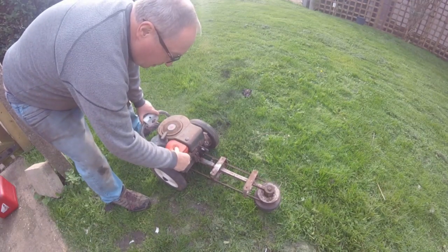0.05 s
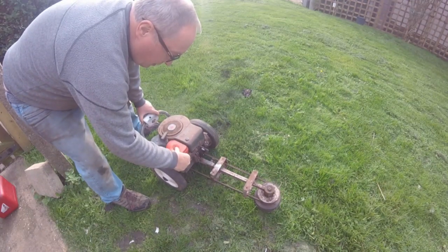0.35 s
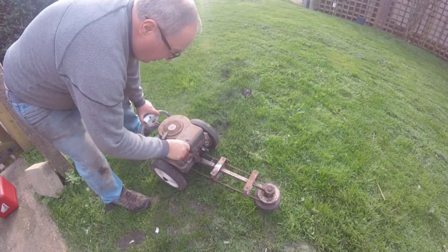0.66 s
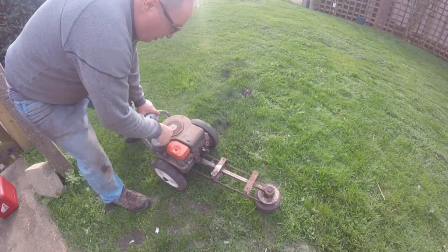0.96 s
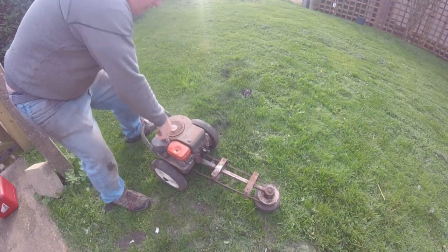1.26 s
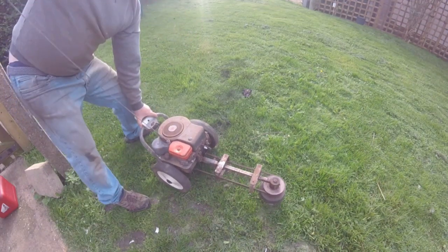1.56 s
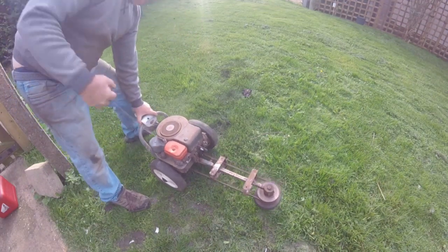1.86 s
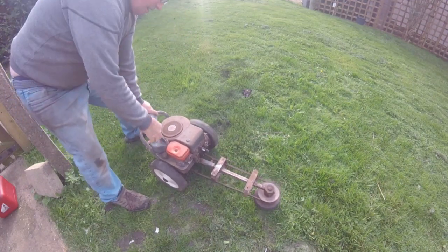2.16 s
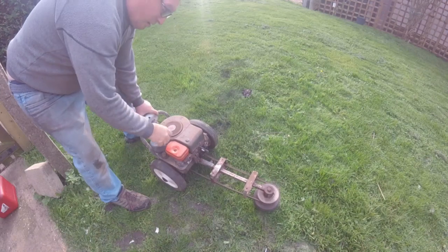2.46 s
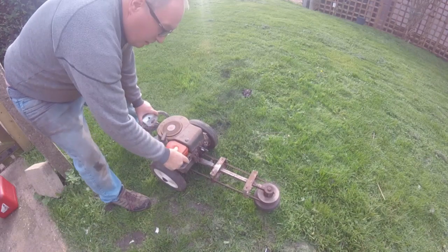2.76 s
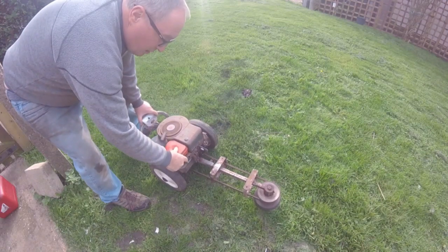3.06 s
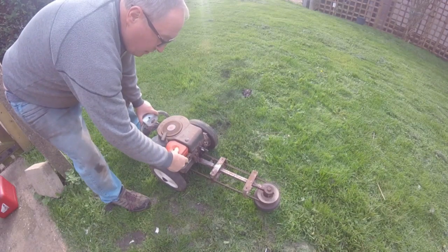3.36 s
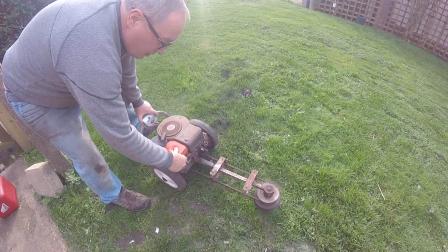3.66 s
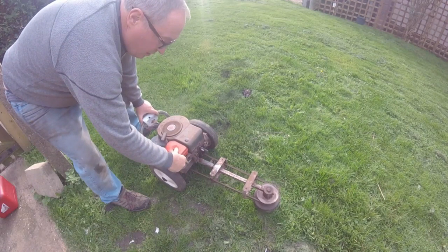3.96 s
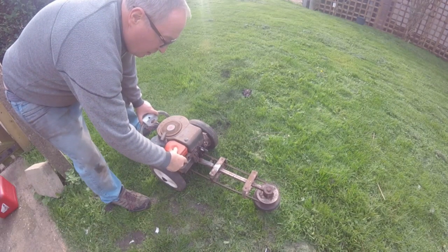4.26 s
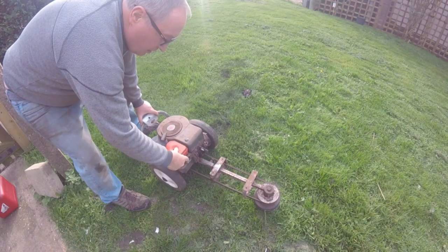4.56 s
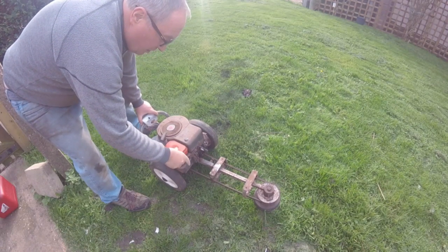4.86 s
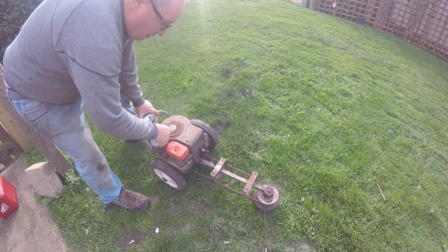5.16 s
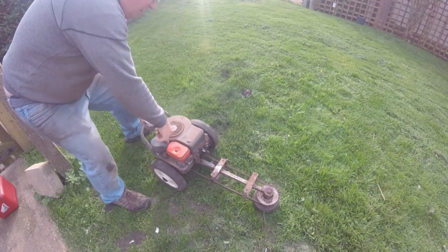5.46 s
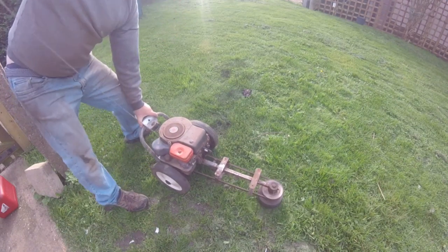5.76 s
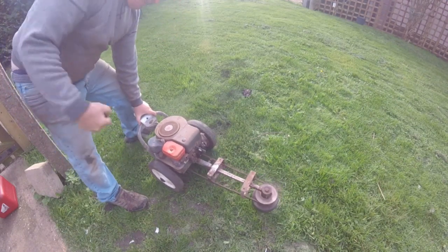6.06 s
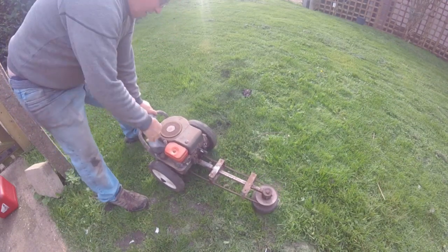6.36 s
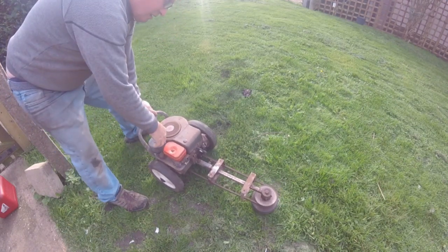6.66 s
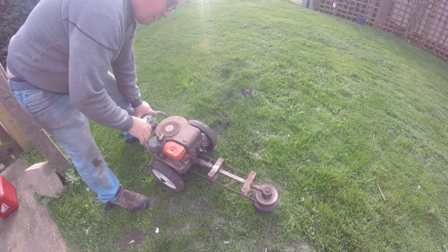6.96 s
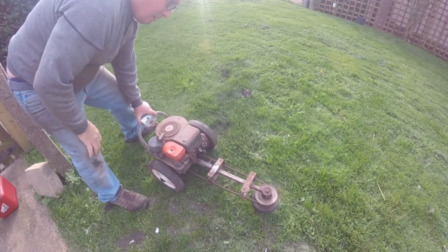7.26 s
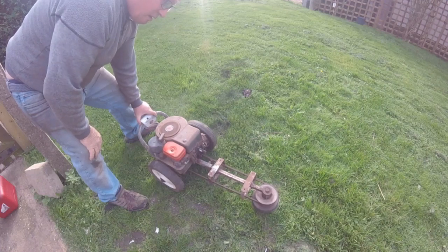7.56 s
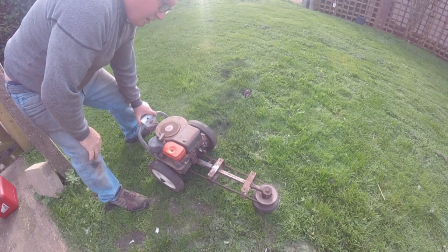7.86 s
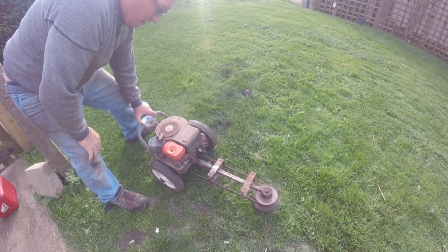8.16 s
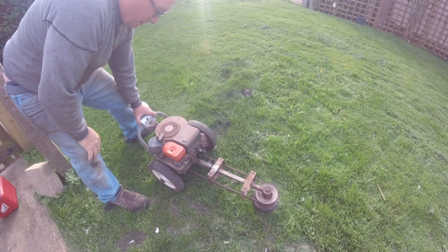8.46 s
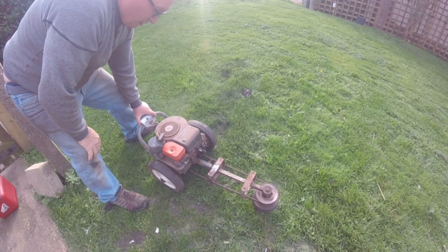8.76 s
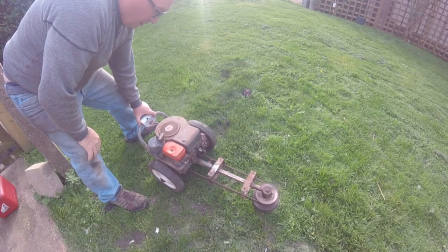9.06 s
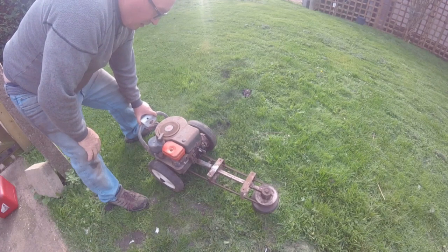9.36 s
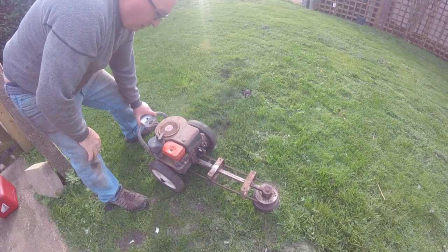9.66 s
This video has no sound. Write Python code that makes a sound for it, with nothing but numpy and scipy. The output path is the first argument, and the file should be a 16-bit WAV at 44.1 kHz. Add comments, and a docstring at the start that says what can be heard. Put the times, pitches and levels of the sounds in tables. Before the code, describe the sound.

Two rasping pulls of a starter rope fire up a garden trimmer's engine, which putters unevenly and dies both times, over light wind.

```python
"""Light wind rumbles over a lawn. At 1.4 s an old single-cylinder petrol engine is pull-started: the pawls
catch, the rope whirrs out by friction and the handle clacks on the resonant cowl. The engine chugs, each
cycle a burn, an exhaust pulse and an intake gasp, over clattering sheet metal, and a fence echoes it.
Near 4 s it stalls. A second pull at 5.6 s starts it again, until it misfires and dies just after 9 s."""
import sys
import numpy as np
from scipy import signal
from scipy.fft import rfft, irfft, next_fast_len
from scipy.io import wavfile
from scipy.ndimage import uniform_filter1d, minimum_filter1d, map_coordinates

SR = 44100
rng = np.random.default_rng(int(sys.argv[2]) if len(sys.argv) > 2 else 0)


def to_wav(sig):
    """Store sig (one row per channel, or 1-D mono) as 16-bit WAV at the path in sys.argv[1].

    Samples outside -1..1 are clipped; the rate is SR.
    """
    pcm = np.clip(np.atleast_2d(sig), -1, 1) * 32767
    pcm = np.round(pcm).astype(np.int16)
    wavfile.write(sys.argv[1], SR, pcm.T)  # frames by channels


N = 432621
TIME = np.arange(N) / SR
AGE = np.arange(-SR // 10, SR // 5) / SR  # seconds around one event

# engine speed, one curve a run: time_s, firing_rate_hz
SPEED = [
    [(1.563, 7.855), (2.141, 13.114), (2.327, 12.435), (2.505, 10.024), (2.712, 9.974), (2.718, 8.823),
     (3.008, 9.635), (3.152, 10.782), (3.26, 9.666), (3.786, 10.035), (3.874, 6.823), (4.415, 2.303)],
    [(5.723, 8.587), (5.913, 5.756), (6.166, 8.25), (6.621, 12.155), (6.798, 10.684), (7.123, 12.364),
     (7.516, 9.154), (7.54, 10.339), (7.687, 9.743), (8.041, 9.44), (8.306, 8.225), (8.439, 8.486),
     (8.903, 7.271), (9.005, 6.579), (9.465, 5.489)],
]
# relative firing strength, one curve a run; a late burn barks: time_s, thump_db, bark_db
EFFORT = [
    [(1.56, -13, -37), (1.69, -6, -25), (1.89, -3.5, -25.5), (2.2, -3, -22), (2.66, -4, -18),
     (3.18, -3.5, -16.5), (3.42, -3.4, -22.5), (3.72, -2, -16.5), (3.91, -12.5, -31), (4.09, -17.5, -48),
     (4.33, -28.5, -56)],
    [(5.72, -10.5, -39), (5.95, -16.5, -46), (6.17, -4, -15), (6.39, -3, -22.5), (6.64, -3, -22),
     (6.72, -4, -17.5), (7.1, -2.5, -21), (7.44, -3, -19), (8.28, -2, -22), (9.06, -4, -19.5),
     (9.21, -14.5, -29), (9.39, -29, -51)],
]
# charges that only half burn: time_s, loss_db
MISFIRES = [(2.46, 4), (8.16, 3), (8.64, 3), (8.9, 7.5)]
HEALTHY_THUMP_DB = -3
LIMP_BELOW_HZ, LIMP_RANGE_HZ, LIMP_SHIFT_S = 10.8, 2.5, .0035

def firings():
    """Four-stroke cycle, one firing in two turns: time_s, cycle_s, thump_db, bark_db, hiss_db, burn_db."""
    runs = []
    for speed, effort in zip(SPEED, EFFORT):
        knots_s, knots_hz = np.transpose(speed)
        t = TIME[(TIME >= knots_s[0]) & (TIME <= knots_s[-1])]
        cycles = np.cumsum(np.interp(t, knots_s, knots_hz)) / SR
        stroke = np.arange(int(cycles[-1]) + 1)
        time_s = np.interp(stroke, cycles, t)
        rate = np.interp(time_s, knots_s, knots_hz)
        # a slow engine limps: every second firing comes later and burns harder
        limp = np.where(stroke % 2, 1, -1) * np.clip((LIMP_BELOW_HZ - rate) / LIMP_RANGE_HZ, 0, 1)
        effort_s, thump_db, bark_db = np.transpose(effort)
        loss_db = sum(db * (np.abs(time_s - when) * rate < .5) for when, db in MISFIRES)
        scatter = rng.standard_normal((len(time_s), 3)).T
        thump_db = np.interp(time_s, effort_s, thump_db) - loss_db + .5 * scatter[0]
        bark_db = np.interp(time_s, effort_s, bark_db) - loss_db + 1.5 * scatter[1]
        vigour_db = thump_db - HEALTHY_THUMP_DB
        hiss_db = -26.5 + 1.43 * vigour_db + .7 * limp + .87 * scatter[2]
        burn_db = -26.5 + .55 * vigour_db + 2 * limp + .32 * np.gradient(rate, time_s)
        time_s += LIMP_SHIFT_S * limp
        runs.append(np.column_stack([time_s, 1 / rate, thump_db, bark_db, hiss_db, burn_db]))
    return np.vstack(runs)


# spectrum of the bark at the exhaust valve: frequency_hz, level_db
BARK = [(100, -31), (300, -18.5), (450, -10.5), (720, -3.5), (950, -5.5), (1160, 1.5), (1350, -13.5),
        (1650, -30), (3000, -47)]
# spectrum of the exhaust jet: frequency_hz, level_db
JET = [(900, -15.5), (1700, -3), (2300, -2.5), (2600, -2), (3100, 0), (3750, -8.5), (5200, -6.5),
       (6000, -15), (6500, -1), (7300, -7.5), (8200, -11.5), (11000, -19), (13000, -26), (16000, -35)]

def exhaust(strokes):
    """Pulsating flow: each slug of gas leaves as a round putt and tears into turbulence at the outlet."""
    time_s, _, thump_db, bark_db, hiss_db, _ = strokes.T
    thump = place(time_s, amp(thump_db - 1.33)[:, None] * silencer_pulses(thump_db))
    # the valve cracks open just ahead of the pulse
    opening = np.clip((AGE + .0059) / .0019, 0, 1)
    bark_level = place(time_s, amp(bark_db + .5)[:, None] * opening * bell(-.0019, .0029))
    bark = colour(bark_level * rng.standard_normal(N), BARK)
    # the jet snaps at its front, hisses, returns once off the ground and trails away
    jet = (.44 * bell(-.002, .00045) + .77 * bell(-.0009, .0022)
           + .38 * bell(.0061, .0018) + .08 * bell(.0024, .019))
    hiss_level = place(time_s, amp(hiss_db)[:, None] * jet)
    hiss = shroud(colour(hiss_level * rng.standard_normal(N), JET))
    outlet_ring = resonance(hiss, hz=2990, width_hz=195, db=-7)
    return thump + bark + hiss + outlet_ring


# transmission of the silencer: frequency_hz, gain_db
SILENCER = [(12, -33), (35, -12.5), (52, -2.5), (100, 2), (118, 0), (131, 4), (150, 1), (195, -2.5),
            (228, -7), (335, -8), (380, -16), (430, -77), (700, -110)]

def silencer_pulses(thump_db, lag_from_hz=278, steepness=5.94):
    """Dispersion: tones near the cut-off come out late, so each putt (of peak 1) flicks upward."""
    hz = np.fft.rfftfreq(len(AGE), 1 / SR)
    corner_hz, db = np.transpose(SILENCER)
    gain = amp(np.interp(np.log(hz + 1), np.log(corner_hz), db))
    lag = (np.minimum(hz, corner_hz[-1]) / lag_from_hz) ** steepness
    phase = .14 - lag + 2 * np.pi * hz * AGE[0]
    # weak strokes push their gas out more slowly
    smear_s = .00007 * np.clip(-thump_db - 8, 0, 12)[:, None]
    pulses = irfft(gain * np.exp(1j * phase - .5 * (2 * np.pi * hz * smear_s) ** 2), len(AGE))
    return pulses / np.abs(pulses).max(axis=1, keepdims=True)


# spectrum of the burning charge: frequency_hz, level_db
BURN = [(300, -25.5), (800, 17), (1400, 1.5), (1900, -4), (2250, 2), (2600, -9.5), (3200, -2.5),
        (4000, -10.5), (6500, -12.5), (9000, -28), (15000, -56)]
CHIRP_HZ, CHIRP_RISE_HZ_PER_S, CYCLE_CAP_S = 2046, 70000, .14

def combustion(strokes):
    """Combustion noise: the charge burns with a rising chirp shortly before the exhaust opens."""
    time_s, cycle_s, _, _, _, burn_db = strokes.T
    cycle_s = np.minimum(cycle_s, CYCLE_CAP_S)[:, None]
    ignition_s = -.165 * cycle_s
    flame = amp(burn_db)[:, None] * bell(ignition_s, .054 * cycle_s)
    hz = CHIRP_HZ + CHIRP_RISE_HZ_PER_S * (AGE - ignition_s)
    phase = np.cumsum(2 * np.pi * hz / SR + .162 * rng.standard_normal(hz.shape), axis=1)
    chirp = amp(-9) * place(time_s, flame * np.sin(phase))
    return chirp + shroud(colour(place(time_s, flame) * grit(spread_db=-.5), BURN))


# hiss spectrum shared by intake, belt and bearings: frequency_hz, level_db
RUSH = [(800, -2), (1700, -7.5), (2400, -2.5), (2750, 0.5), (3250, 0), (3900, -6.5), (5200, -4.5),
        (6000, -7), (6500, -4), (7500, -9.5), (9000, -15), (11000, -17), (15000, -34.5)]

def intake(strokes):
    """Flow noise: the cylinder gasps in air after each exhaust pulse, louder on strong strokes."""
    time_s, cycle_s, thump_db, *_ = strokes.T
    cycle_s = np.minimum(cycle_s, CYCLE_CAP_S)[:, None]
    gasp_db = -39.5 + thump_db - HEALTHY_THUMP_DB
    gasp = place(time_s, amp(gasp_db)[:, None] * bell(.3 * cycle_s, .12 * cycle_s))
    return shroud(colour(gasp * grit(spread_db=3.5), RUSH))


# the crank turns freely until its momentum runs out: start_s, stall_s
RUNS = [(1.66, 4.13), (5.878, 9.24)]
# spectrum of chattering sheet metal: frequency_hz, level_db
CLATTER = [(30, -1), (70, -2), (150, -4.5), (260, -16.5), (400, -12.5), (550, -5), (700, -5), (790, 1),
           (880, -4), (980, -8.5), (1250, -12), (1600, -22.5), (2200, -33), (5000, -58)]
IDLE_HZ, COAST_DB_PER_S = 10, 96

def moving_parts():
    """Forced vibration and friction: loose parts chatter, belt and bearings hiss; both fade on stalling."""
    chatter, friction = np.zeros(N), np.zeros(N)
    for (start_s, stall_s), speed, effort in zip(RUNS, SPEED, EFFORT):
        turning = (TIME > start_s) * amp(-COAST_DB_PER_S * np.maximum(TIME - stall_s, 0))
        octaves = np.log2(np.interp(TIME, *np.transpose(speed)) / IDLE_HZ)
        vigour_db = np.interp(TIME, *np.transpose(effort)[:2]) - HEALTHY_THUMP_DB
        chatter += turning * amp(-29.5 + 3 * octaves)
        friction += turning * amp(-48 + .44 * vigour_db)
    chatter *= amp(1.2 * wobble(70)) * grit(spread_db=4)
    friction *= amp(2.2 * wobble(60)) * grit(spread_db=2.5)
    return colour(chatter, CLATTER) + shroud(colour(friction, RUSH))


# pulls of the starter rope: catch_s, release_s, full_speed_db
PULLS = [(1.359, 1.669, -20), (5.57, 5.862, -20)]
# spectrum of the rope in its eyelet: frequency_hz, level_db
ROPE = [(120, -16.5), (200, -19), (357, -11.5), (405, -20.5), (624, -1), (683, -1.5), (761, 4.5),
        (1720, -16.5), (2950, -19), (3230, -14.5), (3800, -25), (6650, -26.5), (12500, -49.5), (14200, -78),
        (15000, -95)]
ROPE_SLOW_HZ, ROPE_FAST_HZ, ROPE_SPEEDUP_S, ROPE_SAG_HZ_PER_S = 152.3, 632.7, .19, 1700
ROPE_SWELL_DB, ROPE_SWELL_S, ROPE_FADE_DB_PER_S = 10.5, .13, 257

def rope():
    """Periodic friction: the braid rasps through its eyelet, higher and louder with speed, until let go."""
    rasp = np.zeros(N)
    for catch_s, release_s, full_speed_db in PULLS:
        pulled_s, slack_s = np.maximum(TIME - catch_s, 0), np.maximum(TIME - release_s, 0)
        ripple_hz = np.interp(pulled_s, [0, ROPE_SPEEDUP_S], [ROPE_SLOW_HZ, ROPE_FAST_HZ])
        ripple_hz = np.maximum(ripple_hz - ROPE_SAG_HZ_PER_S * slack_s, ROPE_SLOW_HZ)
        db = full_speed_db - ROPE_SWELL_DB * np.maximum(1 - pulled_s / ROPE_SWELL_S, 0)
        db = np.maximum(db - ROPE_FADE_DB_PER_S * slack_s, -200)
        ripples_passed = np.cumsum(ripple_hz * (1 + .035 * wobble(120))) / SR
        ticks = np.diff(np.floor(ripples_passed), prepend=0) * np.sqrt(SR / ripple_hz)
        rub = .66 * ticks * amp(1.7 * wobble(250)) + .73 * grit(spread_db=3)
        rasp += (TIME > catch_s) * amp(db + 1.04 * wobble(90)) * rub
    return shroud(colour(rasp, ROPE))


# knocks and rattles on the cowl, plus one short compression hiss as the engine restarts:
# start_s, knock_db, rattle_db
KNOCKS = [(1.329, -34, -48), (1.363, -7.5, -34), (1.661, -5, -15), (1.671, -10.5, -23.5),
          (1.896, -18, -20.5), (1.919, -6, -36), (3.882, -17, -38), (3.945, -22, -37.5),
          (4.008, -21, -50.5), (4.04, -23, -40), (4.066, -33, -56), (4.147, -25, -59), (4.165, -45, -45),
          (4.301, -30.5, -64), (4.325, -51, -52), (4.408, -34, -68), (5.538, -37.5, -55),
          (5.575, -7, -26.5), (5.855, -43, -26), (5.873, -2, -18), (5.899, -9, -29), (6.147, -10, -17),
          (8.675, -40, -48), (8.94, -26, -39), (9.093, -21, -47), (9.259, -24, -36), (9.367, -23.5, -46.5),
          (9.449, -29, -50)]
# spectrum of rattling steel: frequency_hz, level_db
RATTLE = [(500, -13.5), (1500, -15), (2600, 1), (3400, 1.5), (4500, -3.5), (6600, -3.5), (8500, -12.5),
          (11000, -20), (15000, -50)]
# spectrum of loose parts after a blow: frequency_hz, level_db
SHAKE = [(100, -24), (450, -12), (780, 0), (1050, -6), (1600, -18), (5000, -47)]
RATTLE_T60_S, SHAKE_T60_S = .082, .15

def knocks():
    """Impact excitation: blows ring the cowl and shake loose steel; one noise burst is compression hiss."""
    start_s, knock_db, rattle_db = np.transpose(KNOCKS)
    clack = place(start_s, amp(knock_db)[:, None] * cowl_ring(len(start_s)))
    rise = np.clip(AGE / .0024, 0, 1)
    rattle = place(start_s, amp(rattle_db)[:, None] * rise * decay(RATTLE_T60_S))
    shake = place(start_s, amp(-21.5 + .5 * knock_db)[:, None] * rise * decay(SHAKE_T60_S))
    steel = shroud(colour(rattle * grit(spread_db=-.5), RATTLE))
    return clack + steel + colour(shake * grit(spread_db=1.5), SHAKE)


# modes of the sheet-metal cowl: pitch_hz, level_db, t60_s
COWL_MODES = [(786, -8, 0.13), (852, 6.5, 0.03), (1004, -10, 0.047), (1217, -17.5, 0.028),
              (2517, -14, 0.019), (3330, -16.5, 0.034), (5220, -37, 0.016), (6310, -20.5, 0.019)]

def cowl_ring(blows, attack_s=.0018, scatter_db=2.05, detune=.01):
    """Free vibration: a sum of damped modes, their strength and tuning a little different at each blow."""
    t = np.maximum(AGE, 0)
    ring = np.zeros((blows, len(AGE)))
    for pitch_hz, level_db, t60_s in COWL_MODES:
        size, shift = rng.standard_normal((blows, 2)).T[..., None]
        tone = np.sin(2 * np.pi * pitch_hz * (1 + detune * shift) * t)
        ring += amp(level_db + scatter_db * size) * decay(t60_s) * tone
    return ring * (1 - np.exp(-t / attack_s))


# resonances of the steel shroud and cooling fins: pitch_hz, width_hz, gain_db
SHROUD_MODES = [(2550, 76, -13), (3260, 52, -2.5), (5280, 140, -7), (6460, 160, -7.5), (7220, 96, -5),
                (8240, 80, -6), (13200, 550, 2)]

def shroud(x):
    """Sympathetic resonance: the shroud and fins sing along with the noise that drives them."""
    return x + sum(resonance(x, *mode) for mode in SHROUD_MODES)


# reflections from ground, wall and fence: delay_s, gain
ECHOES = [(.012, -0.094), (0.0157, 0.021), (.0355, .09), (.06, 0.056)]

def garden(x, t60_s=.27):
    """Reflection and scattering: a few distinct echoes and a faint diffuse tail follow the direct sound."""
    t = np.arange(SR // 2) / SR
    tail = unit(rng.standard_normal(len(t)) * amp(-60 * t / t60_s) * (t > .015)) / np.sqrt(len(t))
    echoes = sum(gain * np.interp(TIME - delay_s, TIME, x, 0) for delay_s, gain in ECHOES)
    return x + echoes + amp(-19) * signal.oaconvolve(x, tail)[:N]


# spectrum of light wind and distant rumble: frequency_hz, level_db
AIR = [(12, -21.5), (20, -4.5), (37, -7), (54, -14.5), (92, -19), (144, -23), (372, -30.5), (581, -33.5),
       (746, -33), (857, -34), (1270, -40.5), (1410, -40.5), (8640, -57), (9660, -59), (15500, -76)]

def background():
    """Ambient noise: wind and rumble, a faint ring that dies away at the start, and a thin steady whine."""
    air = amp(-45 + .43 * wobble(5.15)) * unit(colour(rng.standard_normal(N), AIR))
    ring = amp(-57.5 - 60 * TIME / 1.3) * np.sin(2 * np.pi * 755 * TIME + .5 * wobble(25))
    whine = amp(-80) * np.sin(2 * np.pi * 9652 * TIME)
    return air + ring + whine


def amp(db):
    """Decibels to amplitude."""
    return 10 ** (np.asarray(db) / 20)


def unit(x):
    """x scaled to rms 1."""
    return x / np.sqrt(np.mean(x ** 2) + 1e-20)


def wobble(rate_hz):
    """Random modulation: a smooth curve through rate_hz knots a second."""
    return map_coordinates(rng.standard_normal(int(N * rate_hz / SR) + 4), [TIME * rate_hz])


def grit(spread_db):
    """Modulated noise of rms 1, like tiny impacts of unequal size."""
    return unit(rng.standard_normal(N) * amp(spread_db * wobble(900)))


def bell(centre_s, width_s):
    """A Gaussian swell around an event."""
    return np.exp(-.5 * ((AGE - centre_s) / width_s) ** 2)


def decay(t60_s):
    """Exponential damping: 60 dB down at t60_s from the event."""
    return amp(-60 * np.abs(AGE) / t60_s)


def place(times_s, shapes):
    """Superposition: one shape (a row over AGE) is added at each time."""
    at = np.round(times_s * SR).astype(int)[:, None] + np.round(AGE * SR).astype(int)
    return np.bincount(np.clip(at, 0, N).ravel(), shapes.ravel(), N + 1)[:N]


def resonance(x, hz, width_hz, db):
    """The response of one damped resonator to x."""
    return amp(db) * signal.lfilter(*signal.iirpeak(hz, hz / width_hz, SR), x)


def colour(x, spectrum):
    """Minimum-phase filtering to the shape of a spectrum; white noise keeps its power."""
    hz, db = np.transpose(spectrum)
    gain = unit(amp(np.interp(np.log(np.fft.rfftfreq(8192, 1 / SR) + 1), np.log(hz), db)))
    cepstrum = irfft(np.log(gain))
    cepstrum[1:len(gain) - 1] *= 2
    cepstrum[len(gain):] = 0
    return signal.oaconvolve(x, irfft(np.exp(rfft(cepstrum))))[:N]


def scene():
    """Engine and starter sound in the garden, over the outdoor air."""
    strokes = firings()
    engine = exhaust(strokes) + combustion(strokes) + intake(strokes) + moving_parts()
    return (garden(engine + rope() + knocks()) + background())[None]


LIMITER_SAMPLES, TOP_HZ = 200, 15700

def record(dry):
    """Peak limiting and band limiting: fast gain dips hold peaks to full scale; the top treble is cut."""
    needed_gain = 1 / np.maximum(np.abs(dry), 1)
    gain = uniform_filter1d(minimum_filter1d(needed_gain, LIMITER_SAMPLES), LIMITER_SAMPLES)
    size = next_fast_len(N + SR // 2)
    passband = np.fft.rfftfreq(size, 1 / SR) < TOP_HZ
    return irfft(rfft(dry * gain, size) * passband, size)[..., :N]


dry = scene()
out = record(dry)
to_wav(out)
```